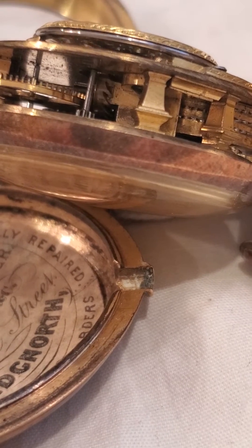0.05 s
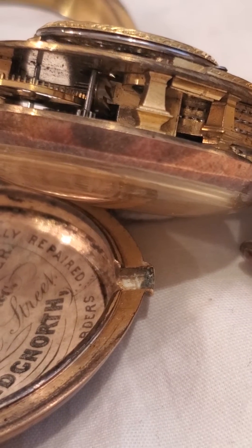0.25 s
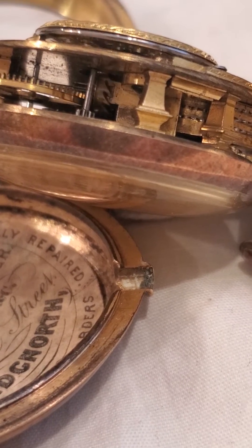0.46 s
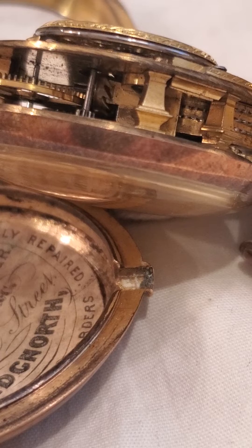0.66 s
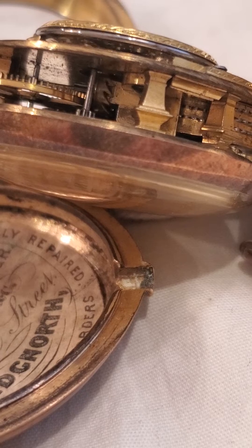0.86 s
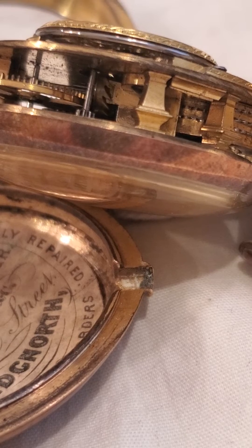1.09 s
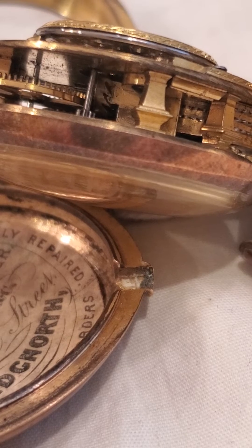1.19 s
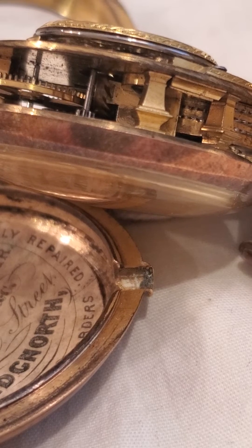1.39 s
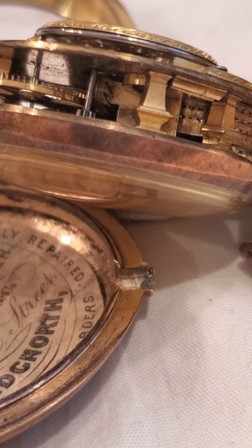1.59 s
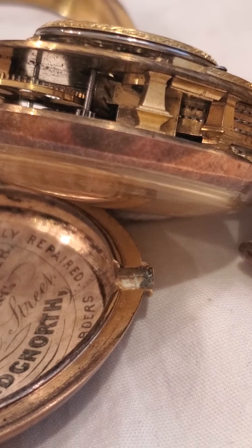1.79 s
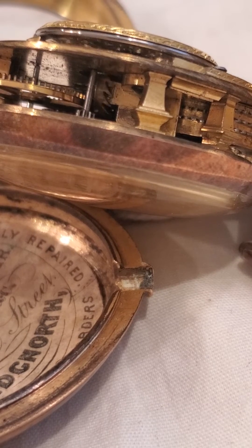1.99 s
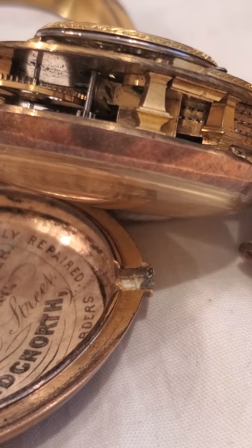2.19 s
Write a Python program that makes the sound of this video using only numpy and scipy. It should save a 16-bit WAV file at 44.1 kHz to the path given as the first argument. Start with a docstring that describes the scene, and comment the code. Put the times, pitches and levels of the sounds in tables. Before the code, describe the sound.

Steady mechanical watch ticking, crisp and brassy, leaning left in stereo, strong and weak beats in turn; early on the handheld microphone is knocked twice with a little skin rustle, amid quiet rumble and hiss.

```python
"""A pocket watch lies open close to the left microphone port, over a low hum, hand rumble and hiss.
From the start, strong ticks and soft tocks take turns: bursts of noise ring its brass movement,
and a wall and the room answer briefly. Soon the hand-held recorder is bumped twice on the left,
two short pressure pulses with skin rustle, and about a second in once, more softly, on the right.
The watch goes on ticking to the end."""
import sys
import numpy as np
from scipy import signal
from scipy.fft import rfft, irfft, next_fast_len
from scipy.io import wavfile
from scipy.ndimage import uniform_filter1d, map_coordinates

SR = 44100
rng = np.random.default_rng(int(sys.argv[2]) if len(sys.argv) > 2 else 0)


def volts_from_db(level):
    """Convert decibel levels to linear amplitude ratios."""
    exponent = np.asarray(level, float) / 20
    return 10 ** exponent


def file_out(sig):
    """Save sig as 16-bit WAV at sys.argv[1]."""
    # one column per channel
    cols = np.atleast_2d(sig).T
    # limit, then scale
    lim = np.clip(cols, -1, 1)
    pcm = np.round(lim * 32767).astype(np.int16)
    wavfile.write(sys.argv[1], SR, pcm)


N = 99225  # samples, 2.25 s


def unit(x):
    """Scale to rms 1."""
    return x / np.sqrt(np.mean(x ** 2) + 1e-20)


def along(points, hz):
    """Read a curve of (Hz, value) points on a log frequency axis."""
    f, v = np.transpose(points)
    return np.interp(np.log(hz + 1), np.log(f + 1), v)


def level(rows):
    """Gain per sample from (seconds, dB) rows."""
    return volts_from_db(np.interp(np.arange(N) / SR, *np.transpose(rows)))


def wobble(rate, size=N):
    """A smooth random curve with rate knots a second."""
    return map_coordinates(rng.standard_normal(size), [np.arange(size) * rate / SR])


def filtered(x, response):
    """Multiply the spectrum of x by a complex response of frequency."""
    m = next_fast_len(x.shape[-1] + SR // 2)
    return irfft(rfft(x, m) * response(np.fft.rfftfreq(m, 1 / SR)), m)[..., :x.shape[-1]]


def peak(f, hz, width_hz):
    """One resonance, which rings only after it is struck."""
    return 1j * f * width_hz / (hz * hz - f * f + 1j * f * width_hz)


def paired(response, alike):
    """Stereo noise of rms 1 with patches of random gain; alike is the left-right correlation."""
    patchy_db = 1.5
    z = signal.stft(rng.standard_normal((2, N)), nperseg=512)[2]
    field = uniform_filter1d(rng.standard_normal(z.shape[1:]), size=6, axis=0)
    field = uniform_filter1d(field, size=14, axis=1)
    pair = signal.istft(z * volts_from_db(patchy_db * unit(field)), nperseg=512)[1][:, :N]

    def shares(hz):
        """Color both noises and share the power between mid and side."""
        turn = np.arccos(np.clip(along(alike, hz), -1, 1)) / 2
        return response(hz) * [np.cos(turn), np.sin(turn)]

    mid, side = filtered(pair, shares)
    return unit(np.array([mid + side, mid - side]))


# The strong beats and the soft beats of the watch.
# Each row: time in seconds, level in dB before the contact's own gain.
STRONG_TICKS = [(.0982, -47), (.4933, -48), (.8904, -45), (1.2835, -46), (1.6781, -45.5), (2.0727, -46)]
SOFT_TOCKS = [(.2813, -54.5), (.6794, -57), (1.0774, -60), (1.4681, -59), (1.8627, -58.5)]
# How the wheel tooth meets the pallet in each kind of beat. One row: how long before the beat's time
# contact starts in seconds, rise in seconds, chatter in seconds, release (time to fall 60 dB) in
# seconds, gain in dB, extra room answer in dB.
TICK_TOUCH = (-.0003, .0002, .004, .013, -5.5, .1)
TOCK_TOUCH = (.0055, .0065, .004, .025, -8, 7)


def watch():
    """The movement ticks and tocks in turn; every beat is a fresh contact."""
    out = np.zeros((2, N + SR))
    for rows, contact in ((STRONG_TICKS, TICK_TOUCH), (SOFT_TOCKS, TOCK_TOUCH)):
        lead, rise, chatter, release, gain_db, room_db = contact
        for s, db in rows:
            b = beat(rise, chatter, release, room_db)
            start = round((s - lead - .004) * SR)  # a beat holds 4 ms before contact
            out[:, start:][:, :b.shape[1]] += volts_from_db(db + gain_db) * b
    return out[:, :N]


# Resonances of the brass movement.
# Each row: frequency in Hz, width in Hz, level in dB before a small random scatter.
BRASS_MODES = [(3220, 580, -16), (5070, 280, -5), (6700, 330, 0), (7900, 220, -11), (9220, 480, -10),
               (10400, 270, -6), (12200, 290, 0), (13500, 330, 0), (14100, 190, -1), (15100, 290, -8)]
# How the watch reaches each port. Each row: frequency in Hz, gain in dB.
WATCH_TO_LEFT = [(2500, -7), (4000, -5), (5200, .5), (6800, 4), (8500, .5), (12000, 6), (14200, 5),
                 (14900, -3), (16200, -14)]
WATCH_TO_RIGHT = [(2500, -6), (3500, -2.5), (4300, -5), (5100, 4), (6500, -10), (8000, -24), (12000, -32),
                  (16000, -36)]


def beat(rise, chatter, release, room_db):
    """The wheel tooth chatters on the pallet and rings the brass; wall and room answer."""
    lumps_per_s, lumpy_db, mode_scatter_db = 1800, 3.5, 1.2
    lead_in_s, lead_in_db = .002, -22  # a faint touch ahead of the contact
    wall_s, wall_db = .0105, -18
    t = np.arange(SR // 16) / SR - .004  # seconds from contact
    shape = np.clip(t / rise, 0, 1) * volts_from_db(-60 * np.clip(t - rise - chatter, 0, None) / release)
    shape = shape + volts_from_db(lead_in_db) * np.exp(-((t + lead_in_s) / .0005) ** 2)
    scatter = rng.normal(0, mode_scatter_db, len(BRASS_MODES))

    def body(f):
        """One broad resonance and the brass modes, as each port hears them."""
        modes = volts_from_db(-11) * peak(f, 10000, 12000)
        for (hz, width_hz, db), extra_db in zip(BRASS_MODES, scatter):
            modes = modes + volts_from_db(db + extra_db) * peak(f, hz, width_hz)
        return modes * volts_from_db([along(WATCH_TO_LEFT, f), along(WATCH_TO_RIGHT, f)])

    lumps = volts_from_db(lumpy_db * wobble(lumps_per_s, size=len(t)))
    ring = filtered(shape * lumps * rng.standard_normal((2, len(t))), body)
    in_contact = (t > 0) & (t < rise + chatter)
    ring = ring / np.sqrt(np.mean(ring[0, in_contact] ** 2))  # left rms 1 during contact
    # the room starts to answer halfway up the rise
    out = np.pad(volts_from_db(room_db) * tail(), ((0, 0), (np.sum(t < rise / 2), 0)))
    out[:, :len(t)] += ring
    out[:, round(wall_s * SR):][:, :len(t)] += volts_from_db(wall_db) * ring
    return out


# How fast the room answer dies. Each row: frequency in Hz, time to fall 60 dB in seconds.
TAIL_DECAY = [(3000, .3), (8000, .33), (13500, .42)]
# Color of the room answer at each port. Each row: frequency in Hz, relative level in dB.
TAIL_COLOR_LEFT = [(2500, -27), (4000, -18), (5200, -10), (6000, -12), (6800, -5), (7600, -13), (10500, -5),
                   (13500, 0), (15500, -5), (16200, -30)]
TAIL_COLOR_RIGHT = [(2500, -10), (3500, -4), (5200, 0), (6800, -4), (7600, -22), (10500, -11), (13500, -22),
                    (15500, -24), (16200, -34)]


def tail():
    """A fresh diffuse room answer at each port: colored noise that builds up, then dies away."""
    left_right_db, build_up_s = (-16, -25), .005
    noise = filtered(rng.standard_normal((2, SR // 2)),
                     lambda f: volts_from_db([along(TAIL_COLOR_LEFT, f), along(TAIL_COLOR_RIGHT, f)]))
    hz, t, z = signal.stft(np.array([unit(v) for v in noise]), SR, nperseg=128)
    decay = volts_from_db(-60 * t / along(TAIL_DECAY, hz)[:, None])
    h = signal.istft(z * decay, SR, nperseg=128)[1]
    build_up = 1 - np.exp(-(np.arange(h.shape[1]) / SR / build_up_s) ** 2)
    return h * build_up * volts_from_db(left_right_db)[:, None]


# Bumps on the left port and on the right port.
# Each row: time in seconds, peak in dB before blunting, rise in seconds, fall in seconds,
# frequency in Hz above which the pulse is blunted.
LEFT_BUMPS = [(.22536, -8.6, .0007, .00088, 3100), (.26014, -15.5, .0011, .0013, 2300)]
RIGHT_BUMPS = [(1.0755, -39, .0025, .002, 300)]


def bumps():
    """Each bump is one short blunt pressure pulse on a single port: a pull left, a push right."""
    t = np.arange(N) / SR

    def port(rows):
        """Add up the pulses on one port."""
        pulses = np.zeros(N)
        for s, db, rise, fall, hz in rows:
            pulse = volts_from_db(db) * np.exp(-np.abs(t - s) / np.where(t < s, rise, fall))
            pulses += filtered(pulse, lambda f: 1 / (1 + (f / hz) ** 4))
        return pulses

    return np.array([-port(LEFT_BUMPS), port(RIGHT_BUMPS)])


# Skin rustle around the left bumps. Each row: time in seconds, level in dB (left port).
RUSTLE_LEVEL = [(.22, -110), (.228, -68), (.255, -70), (.265, -67), (.29, -71), (.33, -85), (.36, -120)]
# Color of the rustle. Each row: frequency in Hz, relative level in dB.
RUSTLE_TINT = [(300, -5), (1000, -.5), (3000, -10), (5000, -24), (9000, -22), (13000, -13), (16000, -30)]


def rustle():
    """Skin rubs the recorder: colored noise, weaker on the right."""
    noise = paired(lambda f: volts_from_db(along(RUSTLE_TINT, f)), [(1000, .2)])
    return level(RUSTLE_LEVEL) * noise * volts_from_db([[0], [-14]])


# Rise and fall of the hand rumble. Each row: time in seconds, level in dB before the overall gain.
RUMBLE_LEVEL = [(0, -68), (.2, -70), (.34, -68), (.7, -68), (.8, -75), (1.05, -70), (1.19, -78),
                (1.32, -66), (1.4, -80), (1.65, -74), (1.8, -81), (1.87, -71), (2.08, -67), (2.25, -72)]


def rumble():
    """The holding hand rumbles: lumpy noise, mostly below 60 Hz."""
    low = paired(lambda f: (f > 25) / (1 + (f / 60) ** 4), [(50, .55)])
    lean = volts_from_db((-1.5, 1.5))[:, None]  # left, right
    lumps = volts_from_db(2.5 * wobble(15))
    return volts_from_db(-2.5) * level(RUMBLE_LEVEL) * low * lean * lumps


# Wavering of the low hum. Each row: time in seconds, level in dB before the overall gain.
HUM_LEVEL = [(0, -68), (.1, -74), (.33, -65), (.44, -73), (1.12, -69), (1.2, -77), (1.29, -68), (1.44, -80),
             (1.49, -67), (1.76, -74), (1.97, -61), (2.07, -78), (2.12, -70), (2.25, -71)]


def hum():
    """A wavering low hum: noise through a narrow resonance, used twice over."""
    noise = paired(lambda f: peak(f, 146, 18) ** 2, [(100, .9)])
    return volts_from_db(-4) * level(HUM_LEVEL) * noise


# Coming and going of a faint higher tone. Each row: time in seconds, level in dB.
TONE_LEVEL = [(0, -86), (.3, -78), (1.0, -77), (1.2, -84), (2.25, -86)]


def tone():
    """A faint higher hum: noise through a still narrower resonance, used twice over."""
    return level(TONE_LEVEL) * paired(lambda f: peak(f, 485, 10) ** 2, [(100, .7)])


# Color of the room air. Each row: frequency in Hz, relative level in dB.
AIR_COLOR = [(70, -30), (110, -6), (160, -3), (210, -5), (290, -1.5), (400, -6), (500, -7), (600, -14),
             (800, -14.5), (1130, -24), (1500, -32), (1950, -60), (3300, -120)]
# How alike the air is at the two ports. Each row: frequency in Hz, correlation.
AIR_ALIKE = [(60, 0.54), (150, 0.82), (380, 0.76), (950, 0.35), (2380, -0.02), (5980, -0.05), (15000, -0.0)]
# How the air leans to the left. Each row: frequency in Hz, left over right in dB.
AIR_LEAN = [(60, -1), (150, -2), (380, 1), (950, -3)]
# Slow swell of the air. Each row: time in seconds, gain in dB.
AIR_SWELL = [(0, -1.5), (.3, .5), (.9, 1.5), (1.3, .1), (1.6, -1.5), (2.25, -.5)]


def air():
    """Room air: steadily colored stereo noise that swells slowly."""
    noise = paired(lambda f: volts_from_db(along(AIR_COLOR, f)), AIR_ALIKE)
    noise = filtered(noise, lambda f: volts_from_db([along(AIR_LEAN, f) / 2, -along(AIR_LEAN, f) / 2]))
    return volts_from_db(-66.5) * level(AIR_SWELL) * noise


# Color of the microphone hiss. Each row: frequency in Hz, relative level per Hz in dB.
HISS_COLOR = [(600, -6), (1200, 5), (1840, 0), (3390, -3), (5000, -8), (7500, -14), (9000, -12),
              (11000, -6), (14500, -6), (15700, -8), (16100, -24), (17000, -40)]


def hiss():
    """Microphone hiss: steady noise above 400 Hz, unrelated and equally set at the two ports."""
    return volts_from_db(-81) * paired(lambda f: volts_from_db(along(HISS_COLOR, f)) * (f > 400), [(1000, 0)])


def scene():
    """Everything at the two ports."""
    return watch() + bumps() + rustle() + rumble() + hum() + tone() + air() + hiss()


# The recorder's low cut, two resonant stages. Each row: corner frequency in Hz, sharpness Q.
LOW_CUT_STAGES = [(67.1, 1.68), (38.1, 1.91)]


def low_cut(x):
    """Two second-order high-pass stages in a row take away the deepest bass."""
    def cut(f):
        """Response of the stages multiplied together."""
        return np.prod([-f * f / (c * c - f * f + 1j * f * c / q) for c, q in LOW_CUT_STAGES], axis=0)

    return filtered(x, cut)


def low_pass(x):
    """Removes everything above the highest recorded frequency."""
    return signal.sosfilt(signal.butter(12, 16500, fs=SR, output="sos"), x)


def record(dry):
    """The recorder cuts the deep bass and stores the sound."""
    mix = low_cut(dry)
    return low_pass(mix)


dry = scene()
out = record(dry)
file_out(out)
```